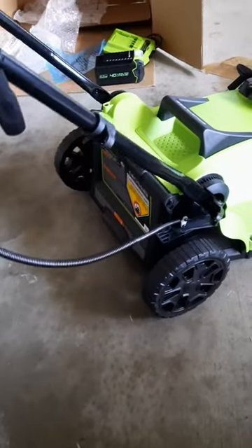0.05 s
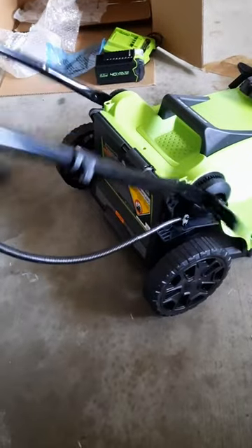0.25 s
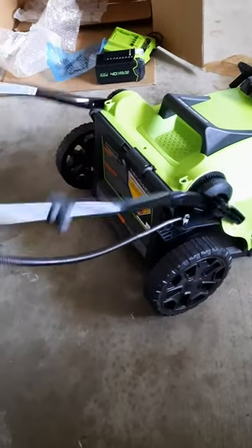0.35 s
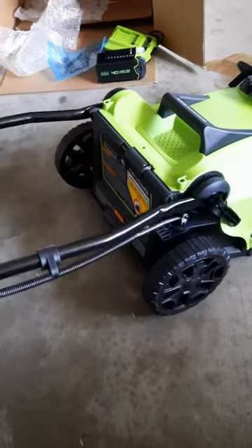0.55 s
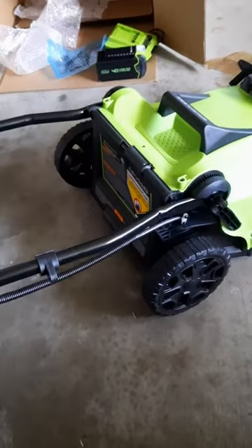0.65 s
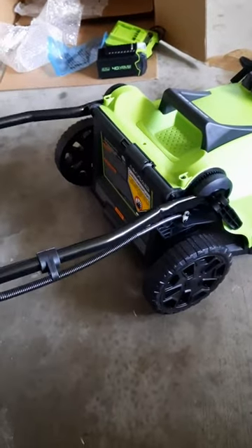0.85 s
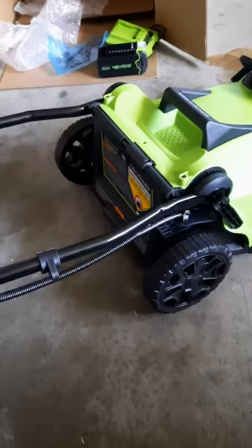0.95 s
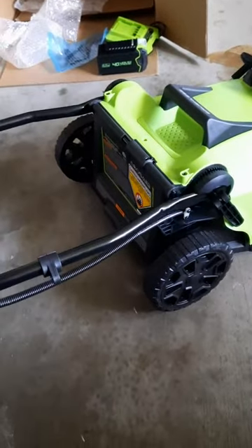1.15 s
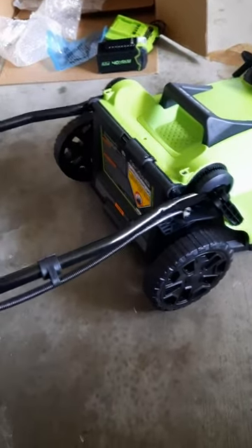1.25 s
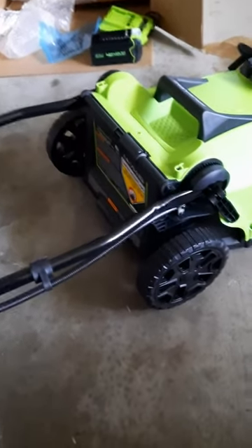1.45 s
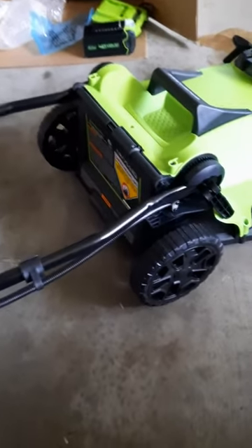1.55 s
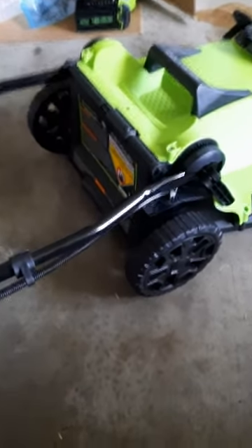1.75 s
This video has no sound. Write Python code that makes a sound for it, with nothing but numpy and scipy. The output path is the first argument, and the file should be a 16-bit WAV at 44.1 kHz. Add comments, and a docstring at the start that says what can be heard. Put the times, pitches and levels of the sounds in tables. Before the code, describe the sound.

A lawn mower's folding handle clatters down, close in a bare garage. After faint room rumble and a dying echo, hollow plastic thumps and pivot scraping start near 0.15 seconds; a bright snap with metallic tube ring lands around 0.34, sharper snaps and clunks at 0.42-0.5, ending by 0.63. Diffuse echo fades over low hum; faint rustle and hiss appear, then soft taps from 1.48 to 1.7.

```python
"""Bare garage: a lawn mower's folding tube handle is swung down close to the microphone.
Plastic pivots scrape: dense random catches, each a click that rings the joint.
Fittings snap past their stops as coloured noise bursts; steel tube and hollow deck ring as decaying modes.
The room adds a diffuse echo. Faint ticks follow as the handle settles, over rumble and a low hum."""
import sys
import numpy as np
from scipy import signal
from scipy.fft import rfft, irfft
from scipy.io import wavfile

SR = 44100
rng = np.random.default_rng(int(sys.argv[2]) if len(sys.argv) > 2 else 0)


def waveform_to_disk(signal):
    """Save audio, clipped to [-1, 1], as 16-bit WAV at the path in sys.argv[1]."""
    frames = np.transpose(np.atleast_2d(signal))
    scaled = np.clip(frames, -1, 1) * 32767
    samples = np.round(scaled).astype(np.int16)
    wavfile.write(sys.argv[1], SR, samples)


N = 79380
T = np.arange(N) / SR
HZ = np.maximum(np.fft.rfftfreq(N, 1 / SR), 1)
CONTACT_LOW_CUT_HZ = 220


def amp(db):
    """Decibels to gain."""
    return 10 ** (np.asarray(db) / 20)


def at_hz(table, hz):
    """Read a table on a log-frequency axis."""
    f, v = np.array(table, float).T
    return np.interp(np.log(hz), np.log(f), v)


def curve(table):
    """Gain over time from (t/s, level/dB) points."""
    return amp(np.interp(T, *np.array(table, float).T))


def fade(t60_s):
    """Exponential decay: 60 dB in t60_s."""
    return np.exp(-np.log(1000) * T / t60_s)


def high_pass(x, hz):
    """Second-order low cut."""
    return signal.sosfilt(signal.butter(2, hz, "high", fs=SR, output="sos"), x)


def convolve(a, b):
    """Pass a sound through a stereo response."""
    return signal.fftconvolve(np.atleast_2d(a), np.atleast_2d(b), axes=1)[:, :N]


def add(out, start_s, sound):
    """Mix a sound in at a time."""
    i = int(np.clip(start_s * SR, 0, N - 1))
    out[:, i:] += sound[..., :N - i]


APART_HZ = 623  # near and above: channels unrelated


def noise(colour):
    """Stereo noise of unit RMS: bass nearly shared, treble unrelated."""
    mid, side = rfft(rng.standard_normal((2, N)))
    apart = np.minimum((HZ / APART_HZ) ** 2 + 0.029, 1)
    signs = np.array([[1], [-1]])
    pair = (mid + signs * apart * side) / np.sqrt(1 + apart ** 2)
    y = irfft(pair * amp(at_hz(colour, HZ)), N)
    return y / y.std()


def ring(modes, phases):
    """Struck part: sum of exponentially decaying sine modes."""
    out = 0
    for (hz, db, t60_s), phase in zip(modes, phases):
        out = out + amp(db) * fade(t60_s) * np.sin(2 * np.pi * hz * T + phase)
    return out


# handle knocks: t/s, deck thump gain/dB, mid clack gain/dB, bright snap gain/dB, tube ring gain/dB
KNOCK_EVENTS = [(0.1618, -29.5, -32, -49.5, -55.5), (0.1774, -25, -30.5, -46, -50),
                (0.1914, -30.5, -25.5, -55, -54.5), (0.1995, -18.5, -26, -55, -51.5),
                (0.2196, -23, -34.5, -32, -47.5), (0.240, -15.5, -27, -30, -62.5),
                (0.2528, -10, -26, -46.5, -58), (0.2783, -20.5, -22.5, -38.5, -61.5),
                (0.3027, -16, -18.5, -40, -34.5), (0.3196, -23, -20, -37, -28),
                (0.3360, -33.5, -12.5, -15, -12), (0.351, -16, -20, -40, -31.5),
                (0.4185, -20.5, -30.5, -7, -45.5), (0.4353, -15.5, -19.5, -35.5, -55),
                (0.455, -16, -24.5, -27.5, -54.5), (0.4789, -23.5, -23, -13, -56),
                (0.4821, -12, -15.5, -27, -53), (0.4953, -12, -20, -36, -38),
                (0.5149, -18.5, -19.5, -30, -51), (0.5573, -19.5, -51, -43, -56),
                (0.6092, -17, -30, -30, -62), (0.6226, -26.5, -31, -41, -58), (0.7821, -34, -52, -73, -75),
                (0.9019, -41, -57, -75.5, -76)]
# hollow plastic deck modes: f/Hz, relative level/dB, t60/s
DECK_MODES = [(153, -16, .1), (199.7, -14, 0.49), (233.8, -11, 0.39), (291, -9.5, 0.21), (308.2, 4, 0.081),
              (350.1, -6.5, 0.2), (391.3, -7.5, 0.17), (426.4, -5, 0.13), (500.9, -14, 0.26),
              (570, -18, 0.094), (666, -16.5, 0.1), (957, -19.5, 0.033)]
# steel tube modes: f/Hz, relative level/dB, t60/s
TUBE_MODES = [(1361, -16.5, 0.13), (1544, -16, .08), (1678, -10, 0.059), (1913, -12.5, 0.31),
              (2260, 4, 0.0942), (2443, -1.5, 0.02), (2837, -19, .18), (4381, -16, 0.11)]
# clack spectrum: f/Hz, relative density/(dB per Hz)
CLACK_COLOUR = [(40, -44), (150, -20), (400, -2.5), (650, 5.5), (1250, -4), (1600, 0), (2300, -8.5),
                (3000, -3.5), (5000, -13), (15000, -60)]
# snap spectrum: f/Hz, relative density/(dB per Hz)
SNAP_COLOUR = [(400, -29), (1500, -12.5), (2800, 1.5), (3500, 5), (4700, 6.5), (5700, 1), (6500, -1),
               (7700, -1.5), (11000, -4.5), (15500, -9.5)]
THUMP_RISE_T60_S, CONTACT_RISE_TAU_S = 0.016, 0.0005
CLACK_T60_S, CHATTER_DB, CHATTER_T60_S = 0.036, -23, 0.13
SNAP_LEFT_DB, SNAP_HOLD_S, SNAP_T60_S = 1, 0.0015, 0.013  # left up, right down by SNAP_LEFT_DB


def knocks():
    """Each contact thumps the deck, clacks and snaps in the fittings, chatters briefly and rings the tube."""
    body, fittings = np.zeros((2, 2, N))
    deck = ring(DECK_MODES, np.zeros(len(DECK_MODES))) * (1 - fade(THUMP_RISE_T60_S))
    tube = ring(TUBE_MODES, rng.uniform(0, 2 * np.pi, (len(TUBE_MODES), 2, 1)))
    chatter = amp(CHATTER_DB) * fade(CHATTER_T60_S)
    rise = 1 - np.exp(-T / CONTACT_RISE_TAU_S)
    held_decay = np.exp(-np.log(1000) * np.maximum(T - SNAP_HOLD_S, 0) / SNAP_T60_S)
    burst = held_decay * amp([[SNAP_LEFT_DB], [-SNAP_LEFT_DB]])
    for start_s, thump_db, clack_db, snap_db, tube_db in KNOCK_EVENTS:
        clack = noise(CLACK_COLOUR) * (fade(CLACK_T60_S) + chatter)
        snap = noise(SNAP_COLOUR) * (burst + chatter)
        contact = amp(clack_db) * clack + amp(snap_db) * snap + amp(tube_db) * tube
        add(fittings, start_s, rise * contact)
        add(body, start_s, amp(thump_db) * deck)
    return body + high_pass(fittings, CONTACT_LOW_CUT_HZ)


# rubbing in the pivots: t/s, level/dB
SLIDE_LEVEL = [(0.15, -57), (0.21, -36.5), (0.26, -25.5), (0.285, -19.5), (0.32, -24.5), (0.35, -50),
               (0.41, -33), (0.445, -28), (0.49, -24.5), (0.54, -36), (0.62, -33.5), (0.68, -60),
               (0.8, -69)]
# scrape spectrum: f/Hz, relative density/(dB per Hz)
SCRAPE_COLOUR = [(120, -30), (300, -4.5), (600, 11), (950, -5.5), (1600, 1.5), (2700, -3), (3800, -5.5),
                 (4700, -11.5), (6000, -7.5), (9500, -17), (15500, -14.5)]
# rubbing joint modes: f/Hz, relative level/dB, t60/s
JOINT_MODES = [(1573, -10, 0.036), (2380, -5.5, .025), (4550, -1, .01), (4800, -1, .008), (12310, -9, .005)]
CATCHES_PER_S, CATCH_SPREAD_DB = 1100, 4  # mean rate; standard deviation
JOINT_GAIN_DB, SCRAPE_T60_S = -5, 0.018


def pivots():
    """Stick and slip: dense tiny catches of uneven size, each a short click that rings the joint."""
    hits = rng.random(N) < CATCHES_PER_S / SR
    sizes = rng.standard_normal(N) * amp(CATCH_SPREAD_DB * rng.standard_normal(N))
    catches = hits * sizes
    joint = amp(JOINT_GAIN_DB) * ring(JOINT_MODES, rng.uniform(0, 2 * np.pi, (len(JOINT_MODES), 2, 1)))
    click = high_pass(noise(SCRAPE_COLOUR) * fade(SCRAPE_T60_S) + joint, CONTACT_LOW_CUT_HZ)
    unit_click = click / np.sqrt(np.sum(click ** 2) / 2)  # unit mean energy per channel
    return convolve(catches / catches.std() * curve(SLIDE_LEVEL), unit_click)


# light taps as the handle settles: t/s, bump f/Hz, bump level/dB, tick level/dB
TAP_EVENTS = [(1.483, 314, -40, -45), (1.501, 319, -31, -60), (1.553, 310, -46, -50.5),
              (1.639, 324, -42, -69.5), (1.696, 621, -44.5, -60.5)]
# tick spectrum: f/Hz, relative density/(dB per Hz)
TICK_COLOUR = [(500, -4.5), (1100, -2), (1550, 4.5), (2400, 3.5), (3000, -21), (7000, -23), (15000, -41.5)]
BUMP_PEAK_S, TICK_T60_S = 0.0036, 0.026


def taps():
    """Soft, quickly damped sine bumps, each with a small noise tick."""
    out = np.zeros((2, N))
    swell = T / BUMP_PEAK_S * np.exp(1 - T / BUMP_PEAK_S)
    for start_s, hz, bump_db, tick_db in TAP_EVENTS:
        bump = amp(bump_db) * swell * np.sin(2 * np.pi * hz * T)
        tick = amp(tick_db) * noise(TICK_COLOUR) * fade(TICK_T60_S)
        add(out, start_s, bump + tick)
    return out


# garage decay: f/Hz, t60/s (negative: that band grows; it lies below the low cut)
ROOM_DECAY = [(100, -0.16), (300, 0.77), (1000, 0.6758), (2500, 0.47), (5000, 0.645), (9000, 0.4031),
              (15000, 0.43)]
# echo colour: f/Hz, relative level/dB
ROOM_TONE = [(80, -21), (290, -5.5), (450, -4), (750, 1.5), (1500, 0.5), (4000, -3.5), (8000, 0.5),
             (15000, -5)]
ROOM_GAIN_DB, ROOM_BUILD_TAU_S, ROOM_LOW_CUT_HZ = -0.5, 0.008, 170


def garage():
    """Diffuse echo of bare walls: noise in overlapping octave bands, each with its own decay."""
    spectrum = rfft(noise([(20, 0), (20000, 0)]))  # white
    colour = amp(at_hz(ROOM_TONE, HZ))
    centres_hz = np.geomspace(62.5, 16000, 9)
    tail = 0
    for hz, share in zip(centres_hz, np.eye(len(centres_hz))):
        weight = np.interp(np.log(HZ), np.log(centres_hz), share)
        band = irfft(spectrum * weight * colour, N)
        decay = fade(at_hz(ROOM_DECAY, hz))
        tail = tail + band * decay / np.sqrt(np.sum(decay ** 2))
    build = 1 - np.exp(-T / ROOM_BUILD_TAU_S)
    return high_pass(amp(ROOM_GAIN_DB) * tail * build, ROOM_LOW_CUT_HZ)


# room rumble spectrum: f/Hz, relative density/(dB per Hz)
FLOOR_COLOUR = [(25, -19), (45, -9.5), (59, 7), (70, -8), (84, -3.5), (110, -7.5), (140, 5.5), (165, -16.5),
                (202, 2.5), (240, -10.5), (320, 0), (500, -15.5), (750, -16), (1200, -33), (3000, -39),
                (7000, -38.5), (13000, -33.5), (16000, -40.5)]
# spectrum of an earlier knock's echo, still dying away: f/Hz, relative density/(dB per Hz)
ECHO_COLOUR = [(100, 6.5), (250, -4), (400, 3), (600, -5.5), (1150, -13), (2200, -4.5), (4000, -16.5),
               (8000, -27.5), (15000, -39.5)]
# faint handling rustle: t/s, level/dB
RUSTLE_SWELL = [(1.1, -85.5), (1.36, -65.5), (1.46, -59), (1.55, -64), (1.64, -65), (1.72, -59),
                (1.8, -60.5)]
# rustle spectrum: f/Hz, relative density/(dB per Hz)
RUSTLE_COLOUR = [(200, 3), (600, 2.5), (1000, -1), (1600, 0), (2500, 0.5), (3200, -5.5), (7000, -13),
                 (15000, -35.5)]
# faint airy hiss: t/s, level/dB
AIR_SWELL = [(1.05, -78.5), (1.25, -63), (1.4, -61.5), (1.5, -82.5), (1.65, -77.5), (1.78, -66.5)]
# hiss spectrum: f/Hz, relative density/(dB per Hz)
AIR_COLOUR = [(1000, -22), (3000, -2.5), (5500, 1.5), (8000, -6.5), (13000, 0.5), (16000, -17.5)]
FLOOR_DB, HUM_DB, HUM_HZ = -47, -53, 83.5
ECHO_DB, ECHO_T60_S = -33.5, 0.63


def background():
    """Noise rumble, sine hum, a fading noise echo, faint handling rustle and hiss."""
    rumble = amp(FLOOR_DB) * noise(FLOOR_COLOUR)
    hum = amp(HUM_DB) * np.sqrt(2) * np.sin(2 * np.pi * HUM_HZ * T + rng.uniform(0, 2 * np.pi))
    echo = amp(ECHO_DB) * noise(ECHO_COLOUR) * fade(ECHO_T60_S)
    rustle = noise(RUSTLE_COLOUR) * curve(RUSTLE_SWELL)
    hiss = noise(AIR_COLOUR) * curve(AIR_SWELL)
    return rumble + hum + echo + rustle + hiss


def scene():
    """The handle and its echo over the quiet room."""
    handle = knocks() + pivots() + taps()
    return handle + convolve(handle, garage()) + background()


# microphone balance: f/Hz, left minus right level/dB
MIC_BALANCE = [(60, 2), (200, 3), (380, 0), (700, 0.5), (1290, 5), (2400, 3.5), (4400, -1.5), (8100, 1.5),
               (15000, 6.5)]
LOW_CUT_HZ, TOP_HZ, PEAK_LIMIT = 76, 15800, 0.9  # limit: linear, full scale 1


def record(dry):
    """Tilt left against right by frequency, cut deep bass, round the loudest peaks, cut the top."""
    lean_db = at_hz(MIC_BALANCE, HZ) / 2
    balanced = irfft(rfft(dry) * amp(np.array([lean_db, -lean_db])), N)
    y = high_pass(balanced, LOW_CUT_HZ)
    y = y / (1 + (y / PEAK_LIMIT) ** 4) ** 0.25
    return signal.sosfilt(signal.ellip(8, 0.2, 70, TOP_HZ, fs=SR, output="sos"), y)


dry = scene()
out = record(dry)
waveform_to_disk(out)
```